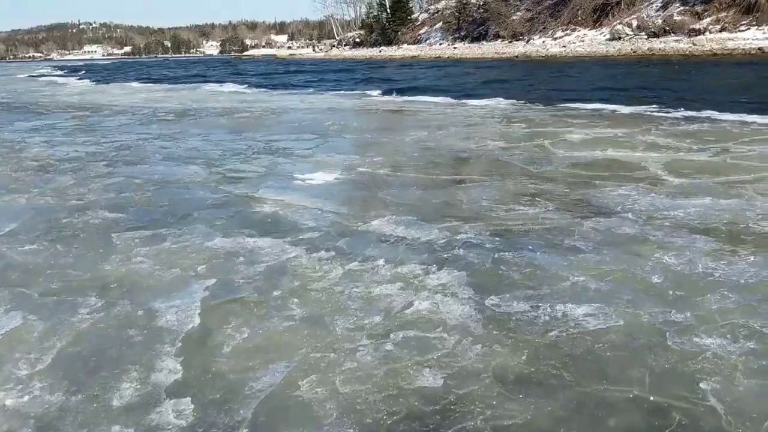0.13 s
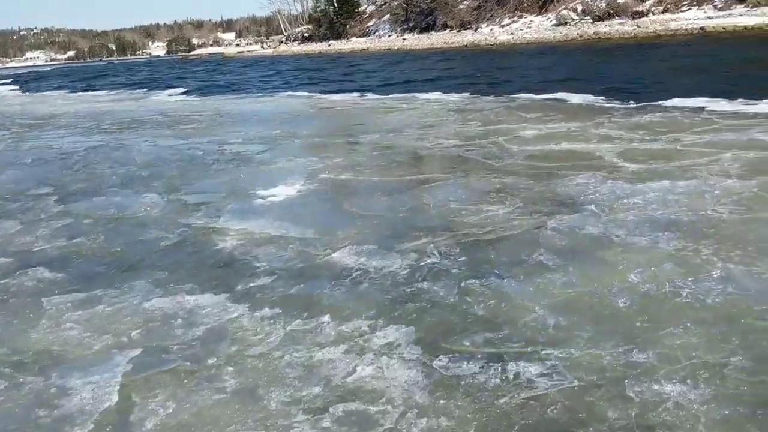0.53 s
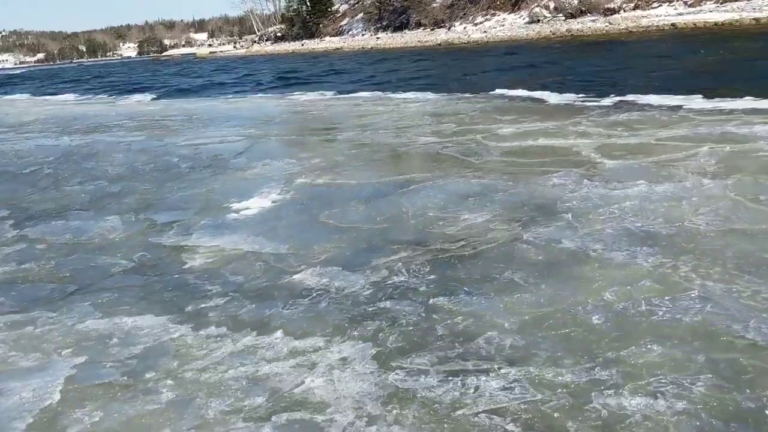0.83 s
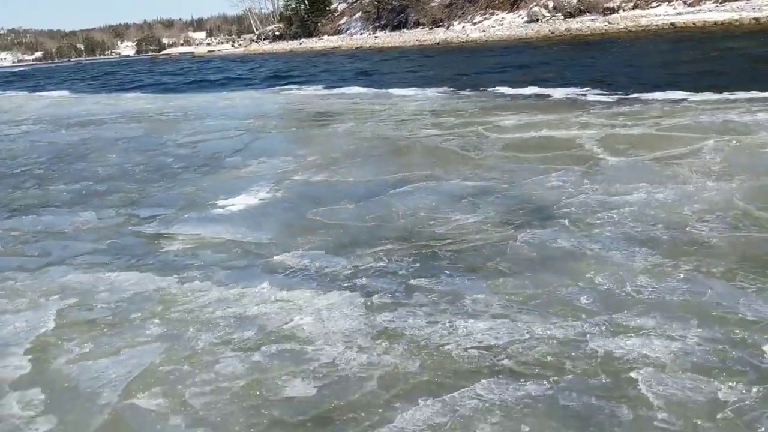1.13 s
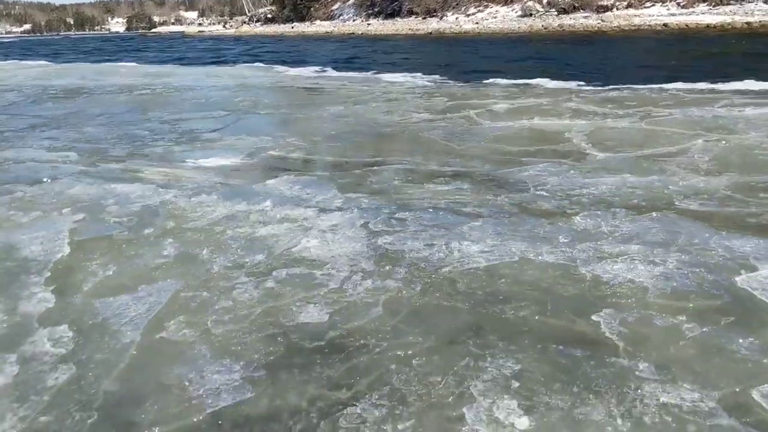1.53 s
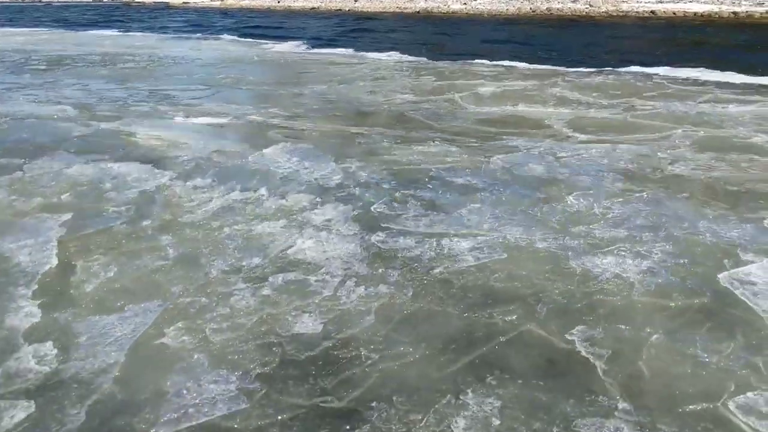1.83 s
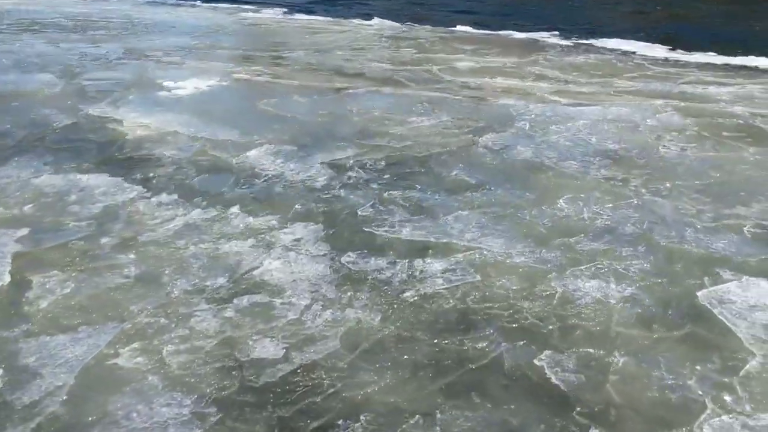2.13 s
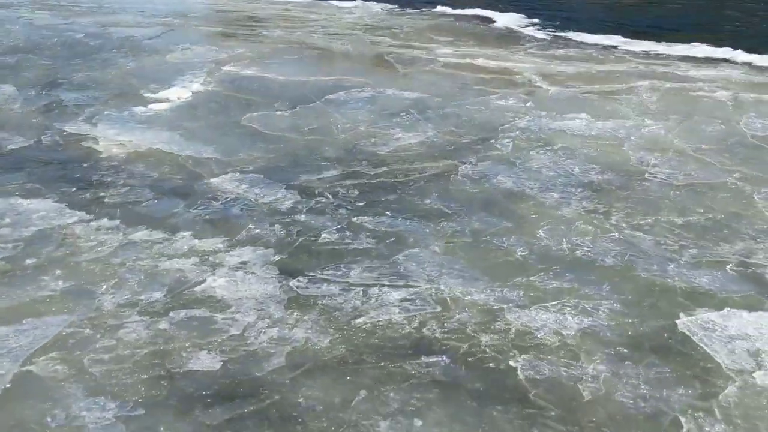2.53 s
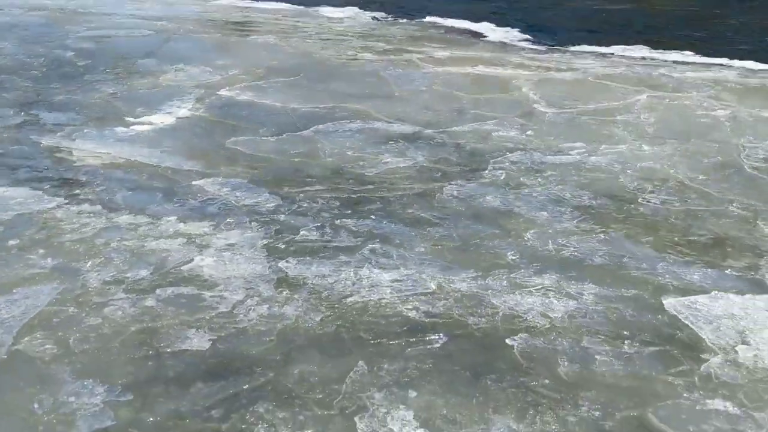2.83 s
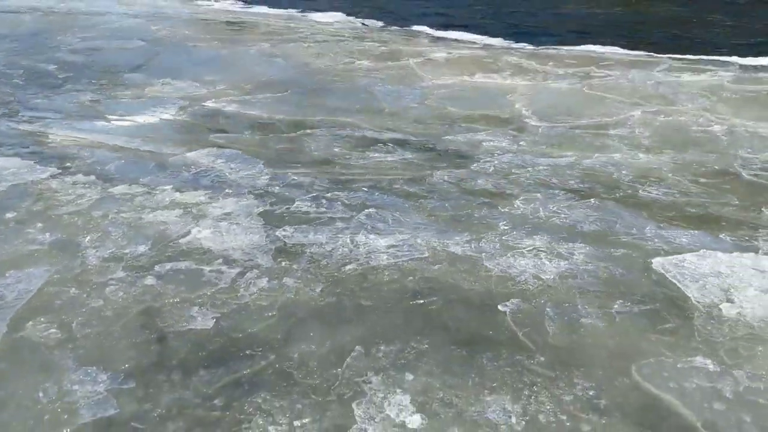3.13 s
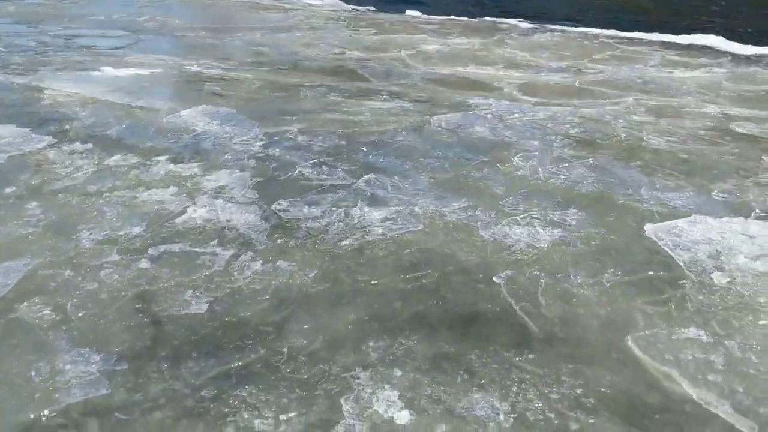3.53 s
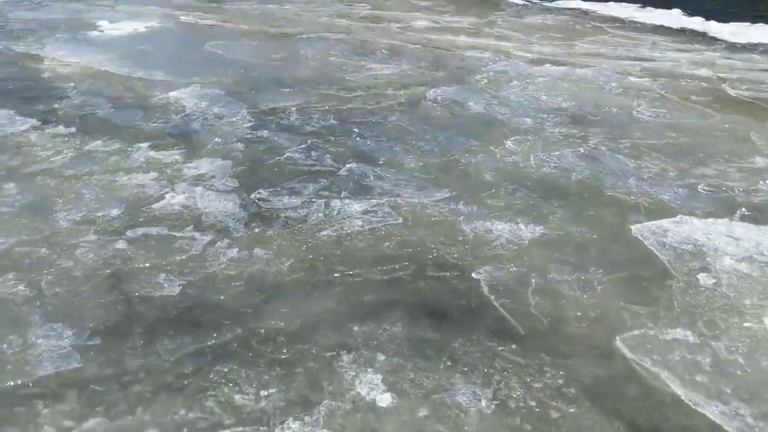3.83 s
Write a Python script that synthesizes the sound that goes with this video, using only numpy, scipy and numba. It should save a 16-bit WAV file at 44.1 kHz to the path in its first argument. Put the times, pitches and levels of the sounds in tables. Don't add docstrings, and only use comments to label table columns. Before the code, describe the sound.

Gusty wind thumps and rumbles on a microphone over faintly fizzing slush ice with small ticks

```python
import sys
import numpy as np
from scipy import signal
from scipy.fft import rfft, irfft, next_fast_len
from scipy.io import wavfile
from scipy.ndimage import uniform_filter1d
from numba import njit

SR = 44100
rng = np.random.default_rng(int(sys.argv[2]) if len(sys.argv) > 2 else 0)


def wrap_up_sound(samples):
    columns = np.atleast_2d(samples).T
    tamed = np.clip(columns, -1, 1)
    steps = np.round(tamed * 32767).astype(np.int16)
    wavfile.write(sys.argv[1], SR, steps)


def magnitude_from_level(level_db):
    exponent = np.asarray(level_db, float) / 20
    return 10 ** exponent


N = 176400

# t/s, level/dB
FIZZ_LEVEL = [(0, -39.5), (.33, -39.5), (.6, -36.5), (.78, -35), (.95, -34), (1.05, -37.5), (1.16, -42),
              (1.5, -41.5), (1.9, -40.5), (2.3, -40.5), (2.6, -39), (2.72, -38), (2.85, -43.5),
              (3.33, -44), (3.45, -41.5), (3.6, -41.5), (3.78, -44.5), (3.96, -44.5)]
# f/Hz, density/dB per Hz
FIZZ_SPECTRUM = [(60, -16), (300, 1), (800, -2), (2000, -4.5), (3700, -10.5), (7300, -10), (10000, -10),
                 (16000, -20)]
# t/s, level/dB
GUST_LEVEL = [(0, -41), (.3, -38.5), (.45, -32.5), (.62, -29), (.9, -25), (1.2, -24), (1.4, -20.5),
              (1.72, -24), (2.05, -23), (2.2, -26.5), (2.4, -22.5), (2.58, -29.5), (2.8, -22.5),
              (3.15, -23.5), (3.33, -31), (3.5, -25), (3.8, -25.5), (3.96, -20.5)]
# f/Hz, density/dB per Hz
RUMBLE_SPECTRUM = [(15, -55), (25, -25), (41, -27), (67, -7), (98, -3), (165, -6.5), (372, -10.5),
                   (900, -28.5), (1170, -61), (1980, -120)]
# crest t/s, peak level/dB, f/Hz
SNAPS = [(0.1862, -20, 676), (1.1553, -12.5, 400), (1.3025, -13.5, 476), (1.354, -15, 480),
         (1.4034, -23, 570), (1.4122, -9, 400), (1.556, -17, 480), (1.6451, -10, 400), (1.9168, -21, 480),
         (2.1717, -14.5, 400), (2.283, -15, 474), (2.3218, -22, 480), (2.3571, -15, 400),
         (2.3728, -17, 476), (2.4531, -21, 674), (2.8057, -12.5, 400), (2.8524, -16, 480),
         (2.917, -17, 570), (3.0252, -17, 480), (3.0583, -26, 400), (3.0664, -7, 400), (3.0816, -17.0, 570),
         (3.1721, -20, 570), (3.288, -14.5, 800), (3.2909, -13.5, 473), (3.5531, -14.5, 400),
         (3.766, -10.5, 480), (3.7698, -13, 330), (3.7798, -14.5, 690), (3.8683, -19, 684),
         (3.8714, -16.5, 573), (3.907, -18, 400), (3.966, -17, 480), (3.9871, -14, 400),
         (3.9948, -16.5, 480)]
# crest t/s, peak level/dB, f/Hz
MORE_THUMPS = [(0.5982, -13, 100), (0.7084, -17, 109), (0.7424, -15, 209), (0.7741, -10.0, 140),
               (0.9143, -9, 119), (0.9751, -12, 147), (1.0662, -8, 172), (1.1259, -10, 120), (1.1494, -11, 170),
               (1.1696, -11.0, 190), (1.317, -8, 138), (1.3927, -12, 280), (1.5576, -10.0, 190),
               (1.7973, -8, 170), (1.9308, -10.5, 90), (2.081, -10.0, 170), (2.0966, -8.5, 308),
               (2.1084, -16, 140), (2.1615, -10, 171), (2.2991, -11.0, 140), (2.3193, -10.5, 354),
               (2.3574, -16, 100), (2.8834, -8.5, 280), (2.9741, -10.0, 210), (3.0177, -11.5, 210),
               (3.0576, -10.5, 366), (3.1211, -10.5, 280), (3.1717, -12, 427), (3.62, -11.5, 121),
               (3.72, -10, 150), (3.849, -10.5, 190), (3.9345, -13, 282), (3.9395, -15, 192), (3.9798, -11, 248),
               (3.9893, -9.5, 100), (3.9909, -10.5, 280), (3.9977, -18, 314)]
# trough t/s, peak level/dB, f/Hz
PULLS = [(0.9236, -15, 191), (1.0014, -9.5, 169), (1.1145, -16, 168), (1.1594, -10, 350),
         (1.3011, -4.5, 232), (1.417, -12, 100), (1.4274, -11, 308), (1.5197, -17, 100), (1.6023, -15, 210),
         (1.6118, -7.5, 230), (1.6424, -14, 150), (2.0934, -5.5, 169), (2.1531, -10.5, 232),
         (2.2705, -11, 140), (2.2803, -7.5, 188), (2.3234, -12.0, 172), (2.3447, -9, 191),
         (2.3689, -11, 170), (2.5113, -9.0, 190), (2.5224, -9.5, 277), (2.5605, -10.5, 221),
         (2.7492, -9.5, 209), (2.7977, -5, 190), (2.8088, -9.5, 139), (2.8553, -2.5, 210), (3.0635, -7, 90),
         (3.0955, -12, 250), (3.1776, -7.5, 190), (3.2077, -9, 147), (3.2898, -8.5, 544), (3.2921, -9, 138),
         (3.5531, -4.5, 250), (3.6599, -17.5, 192), (3.7594, -8, 208), (3.8685, -8, 430)]
# crest t/s, peak level/dB, f/Hz
THUMPS = [(0.961, -4.5, 162), (1.0172, -8.5, 190), (1.1005, -6.5, 150), (1.139, -5, 247),
          (1.156, -3.5, 189), (1.2048, -11, 188), (1.2553, -3.5, 135), (1.3474, -7, 230),
          (1.3546, -5.0, 280), (1.3989, -4.0, 211), (1.4039, -9, 310), (1.4113, -10, 280),
          (1.463, -9.5, 210), (1.4785, -6.0, 276), (1.5859, -2, 188), (1.6594, -3.5, 210), (1.666, -5, 148),
          (1.8075, -7, 250), (1.9172, -4.0, 206), (1.9297, -9, 248), (1.9741, -7.5, 224),
          (2.127, -9.5, 173), (2.2494, -8, 230), (2.4102, -9.5, 280), (2.4224, -7.5, 192),
          (2.6395, -9.5, 185), (2.6966, -6.0, 252), (2.7605, -10.5, 280), (2.8247, -7.5, 210),
          (2.8519, -3.5, 314), (2.9161, -3, 380), (2.9819, -10, 308), (3.0252, -5, 170),
          (3.2036, -4.0, 280), (3.2896, -0.5, 360), (3.5406, -8.5, 230), (3.7109, -10, 250),
          (3.7662, -8, 228), (3.7776, -8.0, 169), (3.9667, -4.5, 230)]
# crest t/s, peak level/dB, f/Hz
STRAY = [
    (3.3225, -12, 326),
]
# t/s, peak level/dB, centre f/Hz, width f/Hz
TICKS = [(0.311, -26, 10000, 5000), (.3594, -28, 11000, 3000), (.5454, -33, 13000, 5000),
         (0.93, -18, 9000, 14000), (.625, -27, 5000, 1500), (.76, -25, 6800, 2000),
         (0.824, -22, 7000, 5000), (.98, -22, 4500, 4000), (1.062, -26, 3480, 3000),
         (1.185, -30.5, 3300, 1500), (1.1994, -38, 13500, 4000), (1.2564, -34, 8000, 8000),
         (1.266, -33, 14500, 2500), (1.3064, -33, 12500, 5000), (1.337, -27, 10000, 6000),
         (1.3543, -17.5, 11500, 14000), (1.53, -32, 6730, 3000), (1.907, -18.5, 9000, 8000),
         (1.925, -24, 5750, 3000), (1.965, -32, 9000, 3000), (2.045, -25, 7500, 8000),
         (2.063, -27, 5530, 2000), (2.087, -24, 10500, 6000), (2.109, -31, 12500, 6000),
         (2.1708, -27, 5170, 2500), (2.4369, -24.5, 7400, 2000), (2.6801, -12.5, 6000, 11000),
         (2.6855, -21, 9000, 10000), (2.69, -24, 2500, 800), (2.79, -24.5, 2680, 2500),
         (2.9612, -25, 8500, 9000), (3.161, -36, 13000, 5000), (3.205, -33, 12000, 3000),
         (3.169, -28.5, 8000, 5000), (3.4, -33, 4430, 4000), (3.5922, -29, 5010, 3000),
         (3.8305, -32.5, 3700, 1000), (3.8681, -29.5, 6890, 2500), (3.9577, -23.5, 7560, 3000)]

GUST_MEAN_DB = -24


def shape(x, gain_of_hz):
    size = next_fast_len(N + 4096)
    f = np.arange(size // 2 + 1) * SR / size + 1e-3
    return irfft(rfft(x, size) * gain_of_hz(f), size)[..., :N]


def colour(points):
    hz, db = np.array(points).T
    return lambda f: magnitude_from_level(np.interp(np.log(f), np.log(hz), db, left=-90))


def unit(x):
    return x / np.sqrt(np.mean(x ** 2))


def curve(table):
    t, db = np.array(table).T
    return np.interp(np.arange(N) / SR, t, db)


def walk(rate_hz):
    hold = int(SR / rate_hz)
    steps = np.repeat(rng.standard_normal(N // hold + 1), hold)
    slewed = uniform_filter1d(uniform_filter1d(steps, hold), hold)
    return unit(slewed[:N])


def lap():
    centre_hz, width_hz, end_s, fade_s = 400, 220, 0.28, 0.1
    wash = shape(rng.standard_normal(N), lambda f: 1 / (1 + ((f - centre_hz) / width_hz) ** 2))
    fade = (1 - np.tanh((np.arange(N) / SR - end_s) / fade_s)) / 2
    return unit(wash) * magnitude_from_level(-33.5 + 1.5 * walk(29.5)) * fade


def crackle():
    clicks_per_s, spread_db = 450, 5
    draw = rng.random((int(clicks_per_s * N / SR), 2))
    clicks = np.zeros(N)
    clicks[(draw[:, 0] * N).astype(int)] = magnitude_from_level(-spread_db * np.log(draw[:, 1] + 0.016))
    decay = np.exp(-np.arange(200) / 30)
    grains = np.convolve(clicks, decay)[:N] * rng.standard_normal(N)
    return unit(shape(grains, lambda f: f / (f + 5000)))


def fizz():
    crackle_db, swell_db, patch_db, flicker_db = -5.5, .35, .4, .8
    grain = rng.standard_normal(N) + magnitude_from_level(crackle_db) * crackle()
    grain = shape(grain, colour(FIZZ_SPECTRUM))
    swell = walk(14)
    patches = [walk(9.34) for _ in range(6)]
    out = np.zeros(N)
    for k in range(18):
        band = shape(grain, lambda f: np.cos(np.pi / 2 * np.clip(2 * np.log2(f / 50) - k, -1, 1)) ** 2)
        level_db = swell_db * swell + patch_db * patches[k // 3] + flicker_db * walk(16)
        out += band * magnitude_from_level(level_db)
    heard = shape(out, lambda f: (f > 1500) * (f < 7500))
    return out / np.std(heard) * magnitude_from_level(curve(FIZZ_LEVEL))


@njit
def wavelets(at, hz, size, turns, sag, length, sr):
    out = np.zeros(length)
    for e in range(len(at)):
        phase, i = 0., at[e]
        while phase < 6 * turns and i < length:
            u = phase / turns
            out[i] += size[e] * (u * np.exp(1 - u)) ** 2 * np.cos(2 * np.pi * (phase - turns))
            phase += hz[e] / sr / (1 + sag * phase)
            i += 1
    return out


def eddies():
    per_s, spread_db, middle_hz, octaves, octaves_per_db = 230, 3, 213.3, 0.94, .05
    draw = rng.random((int(4 * per_s), 4))
    at = (draw[:, 0] * N).astype(np.int64)
    size = magnitude_from_level(-spread_db * np.log(draw[:, 1] + 0.15)) * np.sign(draw[:, 2] - .4)
    hz = middle_hz * 2 ** (octaves * (2 * draw[:, 3] - 1))
    hz = hz * 2 ** (octaves_per_db * (curve(GUST_LEVEL)[at] - GUST_MEAN_DB))
    return wavelets(at, hz, size, .45, .38, N, 1. * SR)


def buffeting():
    rumble_db, buffet_db, top_hz = -5.5, 1.58, 880
    rumble = shape(rng.standard_normal(N), colour(RUMBLE_SPECTRUM + [(3000, -90)]))
    bed = unit(eddies()) + magnitude_from_level(rumble_db) * unit(rumble)
    bed = unit(bed * magnitude_from_level(buffet_db * walk(35)))
    low_pass = signal.butter(2, top_hz, fs=SR, output="sos")
    return signal.sosfiltfilt(low_pass, bed * magnitude_from_level(curve(GUST_LEVEL) + 2.5))


def drone():
    corner_hz, level_db, follows = 100, -30, 0.76
    low = unit(shape(rng.standard_normal(N), lambda f: 1 / (1 + (f / corner_hz) ** 3)))
    return low * magnitude_from_level(level_db + follows * (curve(GUST_LEVEL) - GUST_MEAN_DB))


def swings(table):
    width_turns, gain_db, half = .37, .3, 2000
    t = np.arange(-half, half) / SR
    out = np.zeros(N + 2 * half)
    for s, db, hz in table:
        i = int(s * SR)
        bell = np.exp(-(t * hz / width_turns) ** 2 / 2)
        out[i:i + 2 * half] += magnitude_from_level(db + gain_db) * bell * np.cos(2 * np.pi * hz * t)
    return out[half:half + N]


def wind():
    pushes = swings(THUMPS) + swings(MORE_THUMPS) + swings(SNAPS) + swings(STRAY)
    mix = buffeting() + pushes - swings(PULLS) + drone()
    return signal.sosfilt(signal.butter(4, 52, "high", fs=SR, output="sos"), mix)


def ticks():
    size, rise_s, tail, tail_s = 1024, .0009, .1, .006
    out = np.zeros(N)
    t = np.arange(size) / SR
    f = np.arange(size // 2 + 1) * SR / size
    for s, db, hz, width_hz in TICKS:
        noise = rng.standard_normal(size)
        snap = irfft(rfft(noise) / (1 + ((f - hz) / (width_hz / 2)) ** 2))
        ring = irfft(rfft(noise[::-1]) / (1 + ((f - hz) / width_hz) ** 2))
        burst = snap * t / rise_s * np.exp(1 - t / rise_s) + tail * ring * np.exp(-t / tail_s)
        burst *= magnitude_from_level(db) / np.abs(burst).max()
        i = int(s * SR)
        out[i:i + size] += burst[:N - i]
    return out


def scene():
    return (lap() + fizz() + wind() + ticks())[None]


def port_db(f):
    drop_db, resonance_hz, edge_hz = -12, 8000, 260
    return drop_db * (1 + np.tanh((f - resonance_hz) / edge_hz)) / 2


def top_cut(x):
    return signal.sosfilt(signal.butter(12, 15710, fs=SR, output="sos"), x)


def record(dry):
    top_hz, headroom = 15790, 0.75
    x = shape(dry, lambda f: magnitude_from_level(port_db(f)) * (f < top_hz))
    mix = headroom * np.tanh(x / headroom)
    return top_cut(mix)


dry = scene()
out = record(dry)
wrap_up_sound(out)
```